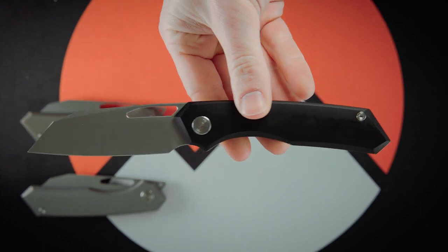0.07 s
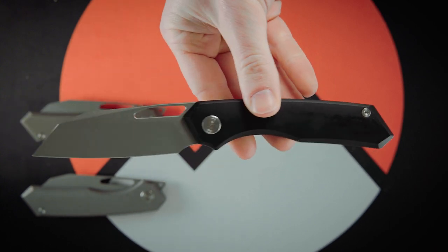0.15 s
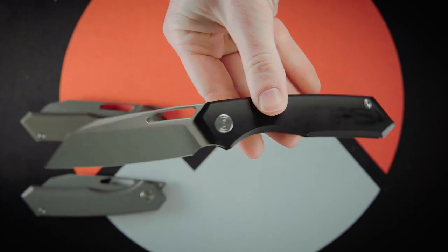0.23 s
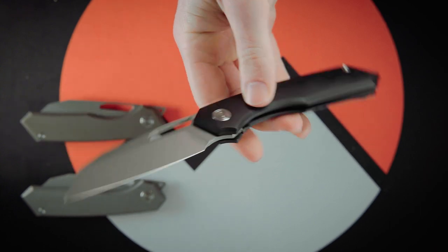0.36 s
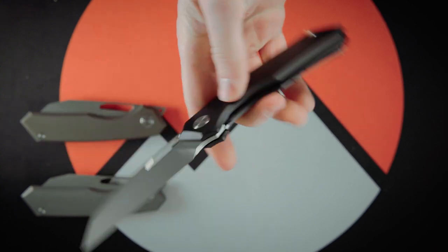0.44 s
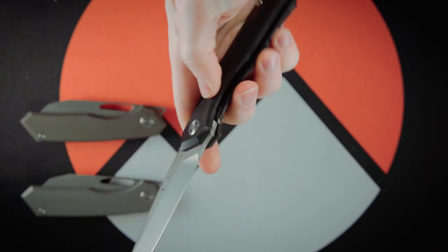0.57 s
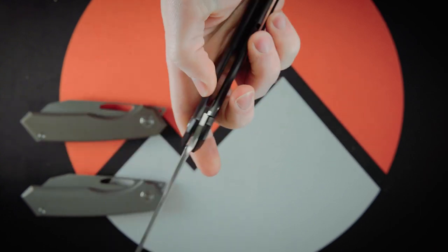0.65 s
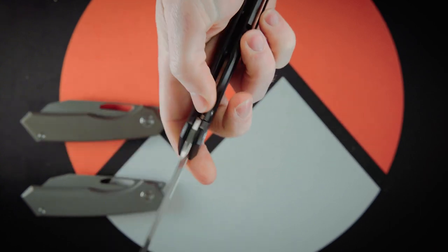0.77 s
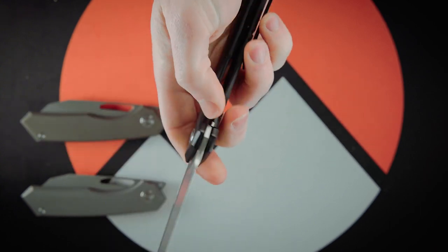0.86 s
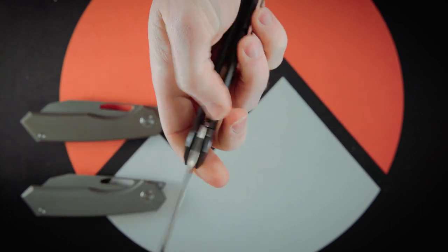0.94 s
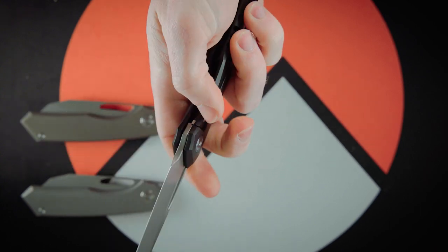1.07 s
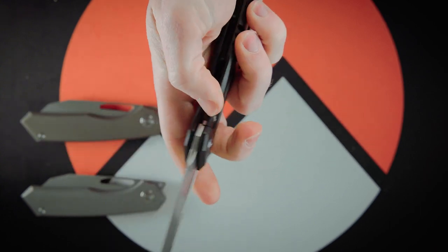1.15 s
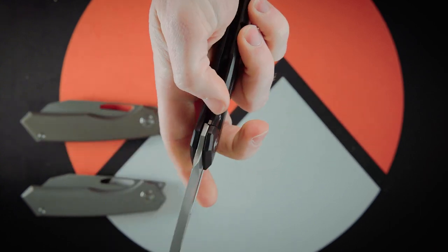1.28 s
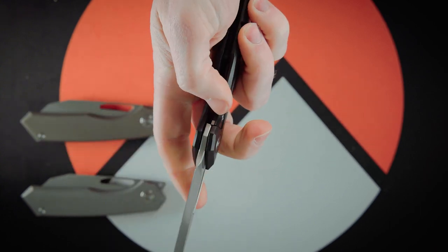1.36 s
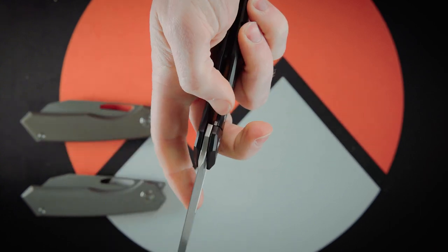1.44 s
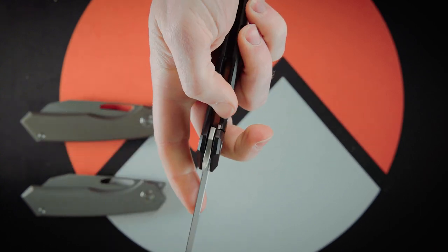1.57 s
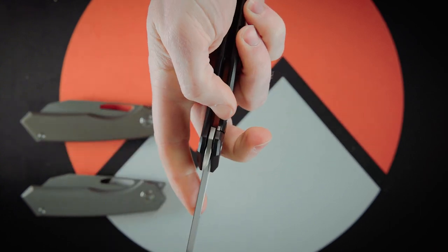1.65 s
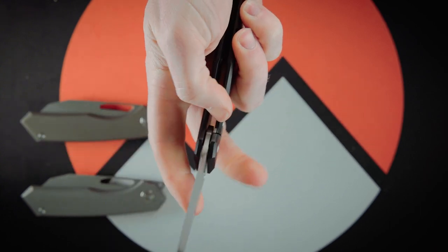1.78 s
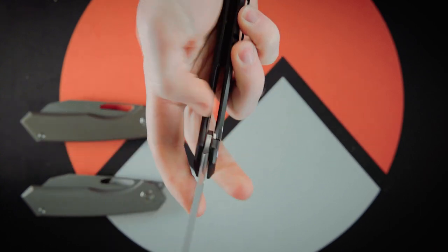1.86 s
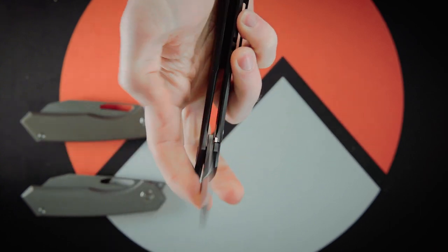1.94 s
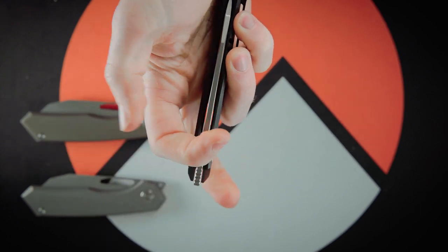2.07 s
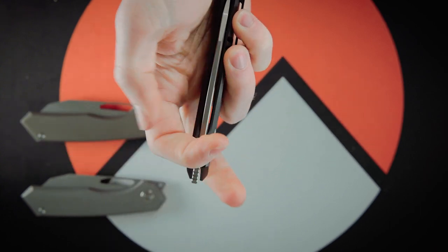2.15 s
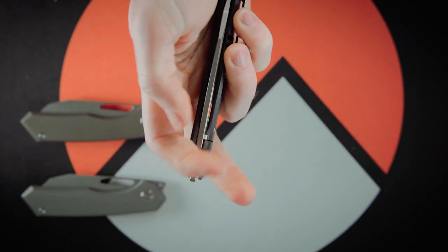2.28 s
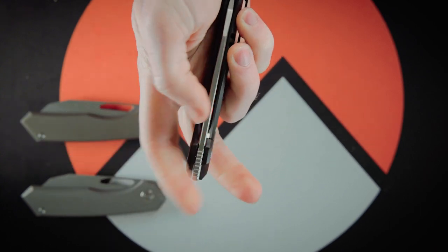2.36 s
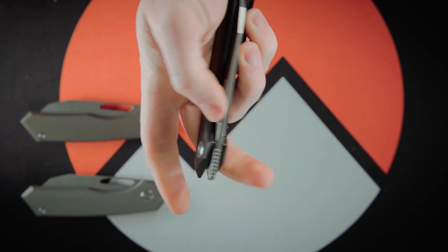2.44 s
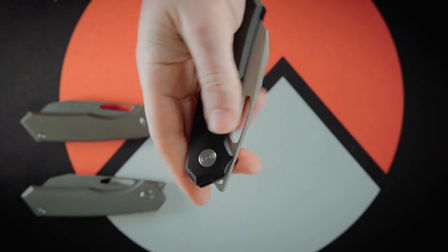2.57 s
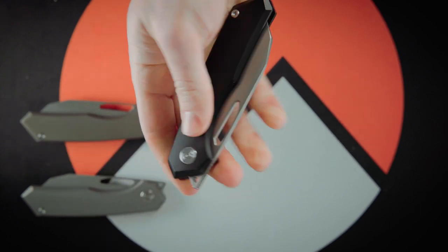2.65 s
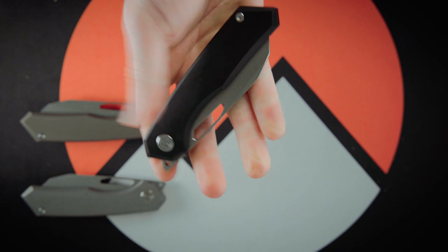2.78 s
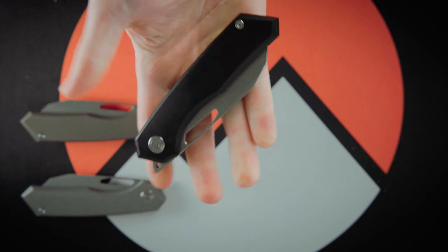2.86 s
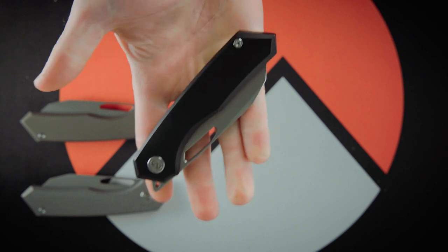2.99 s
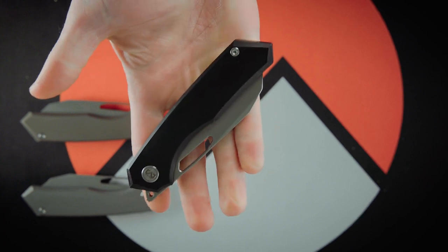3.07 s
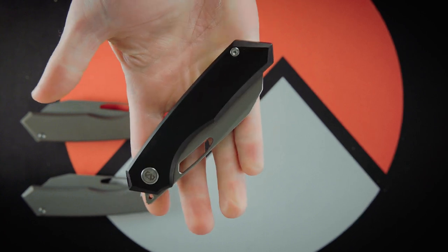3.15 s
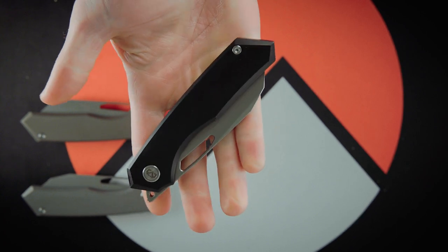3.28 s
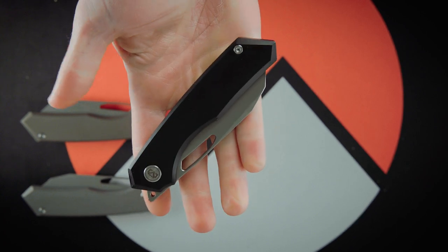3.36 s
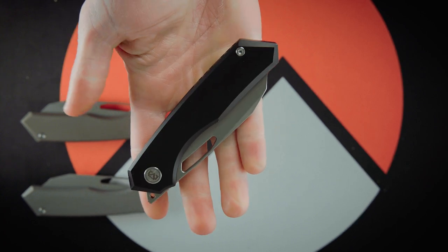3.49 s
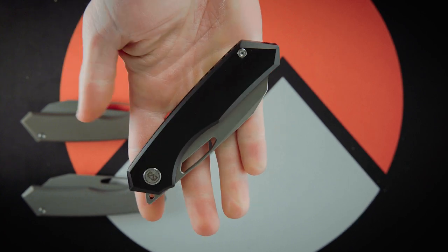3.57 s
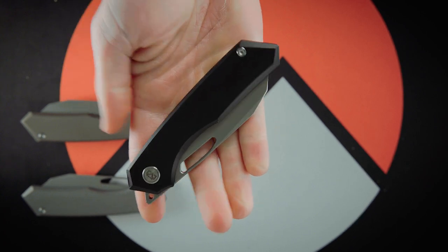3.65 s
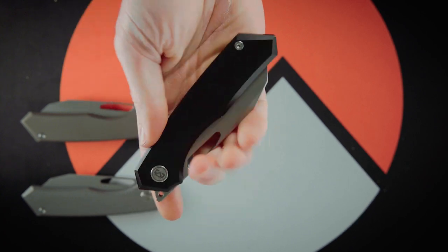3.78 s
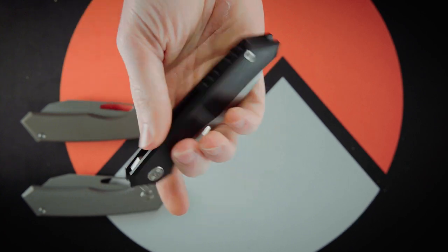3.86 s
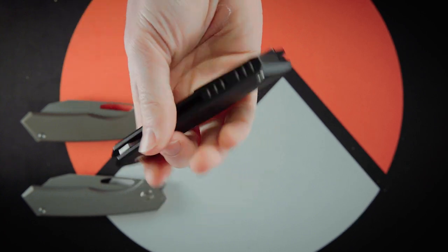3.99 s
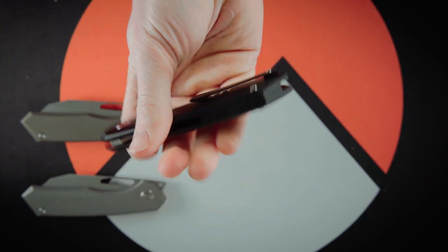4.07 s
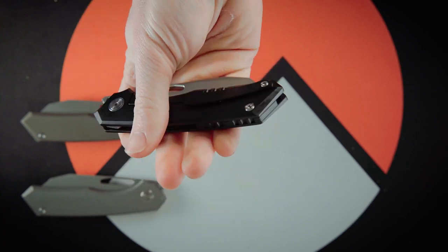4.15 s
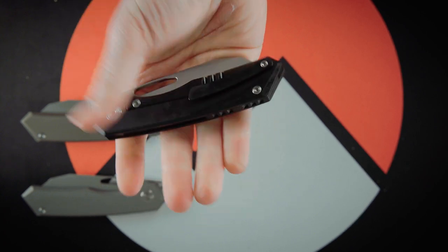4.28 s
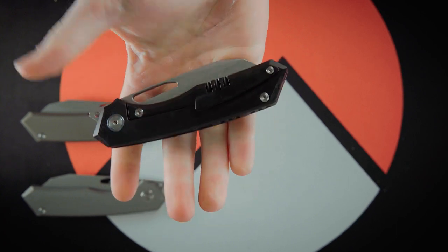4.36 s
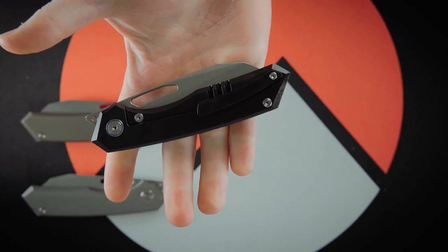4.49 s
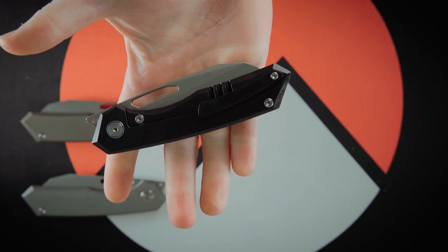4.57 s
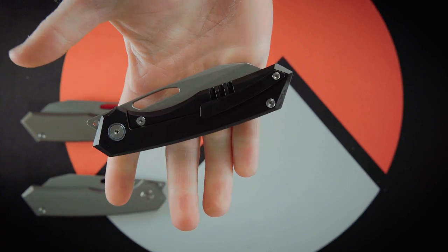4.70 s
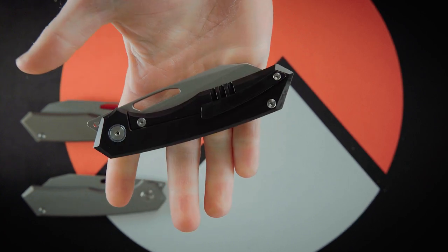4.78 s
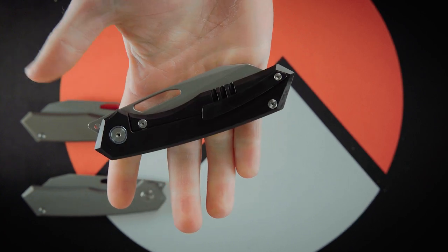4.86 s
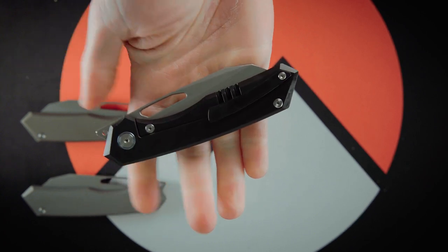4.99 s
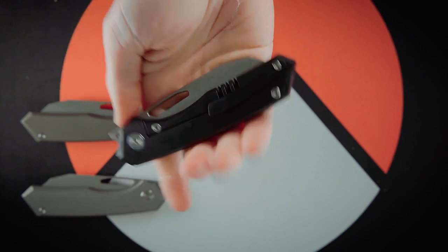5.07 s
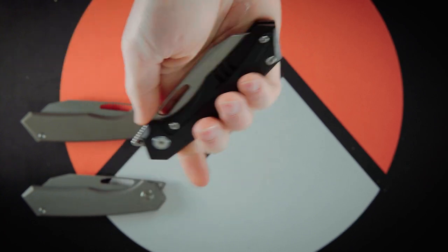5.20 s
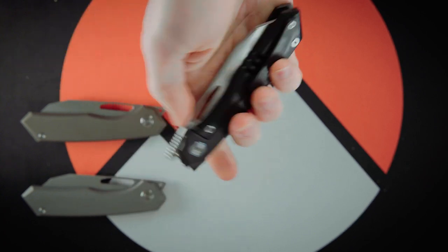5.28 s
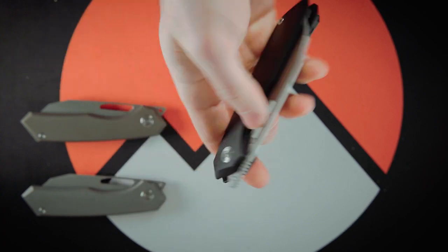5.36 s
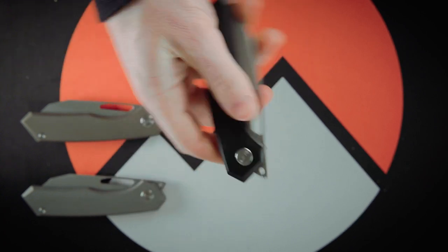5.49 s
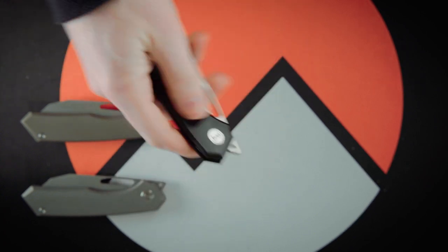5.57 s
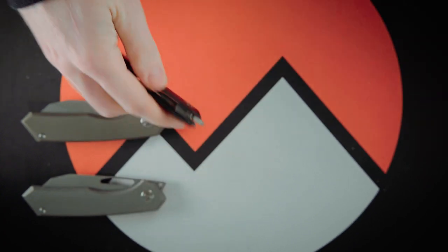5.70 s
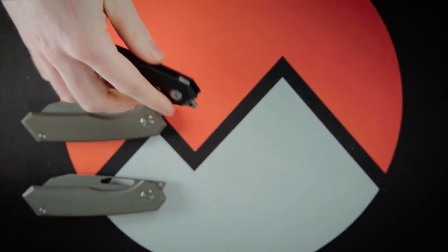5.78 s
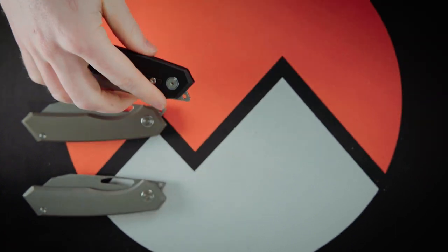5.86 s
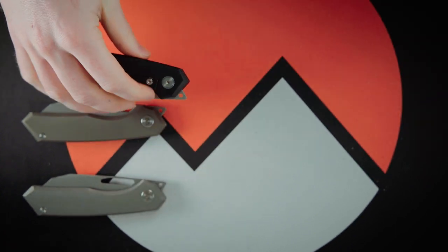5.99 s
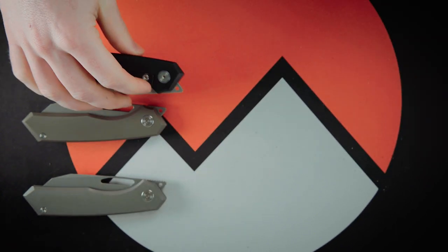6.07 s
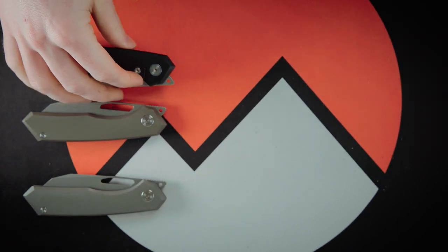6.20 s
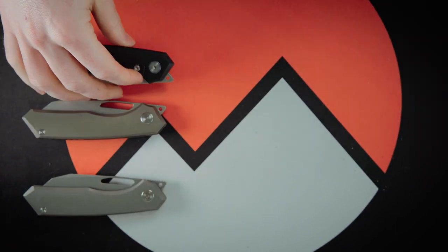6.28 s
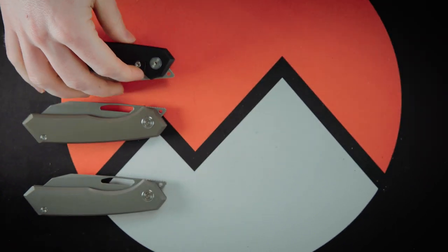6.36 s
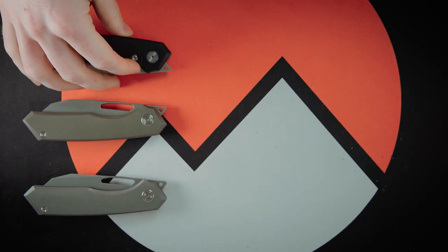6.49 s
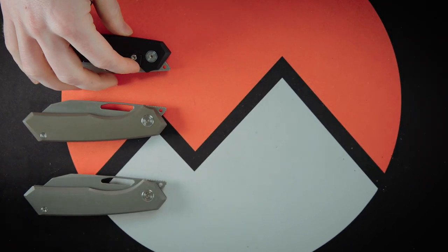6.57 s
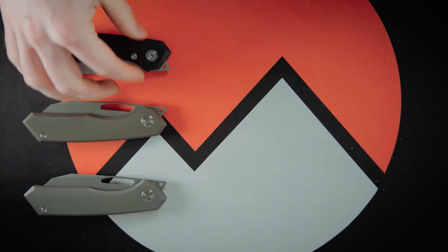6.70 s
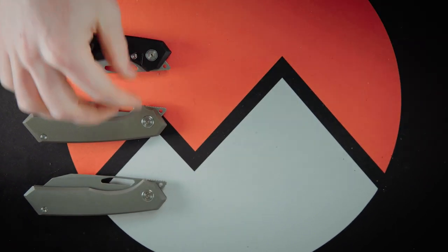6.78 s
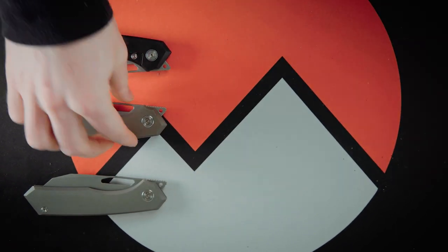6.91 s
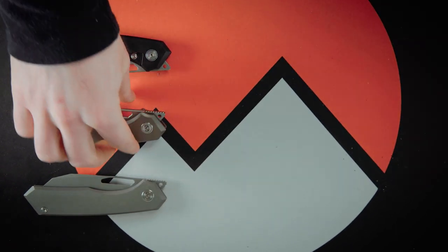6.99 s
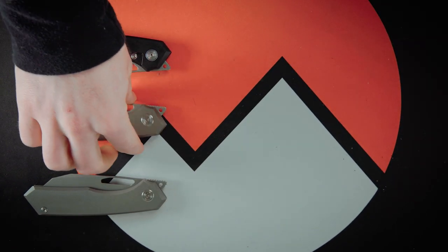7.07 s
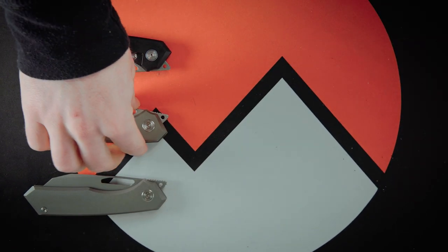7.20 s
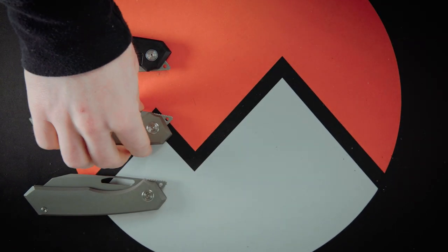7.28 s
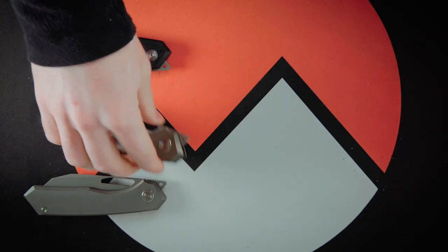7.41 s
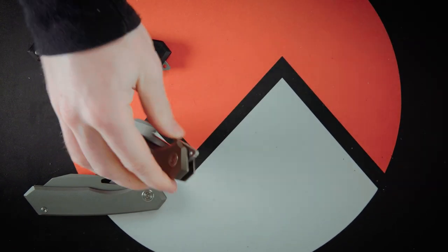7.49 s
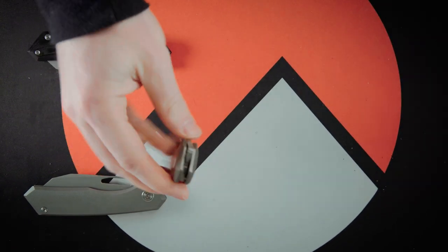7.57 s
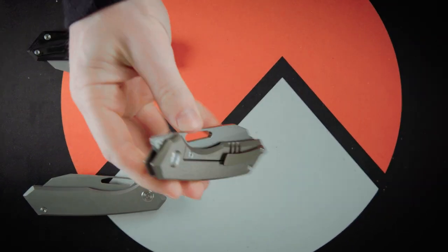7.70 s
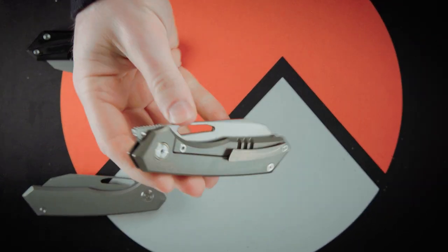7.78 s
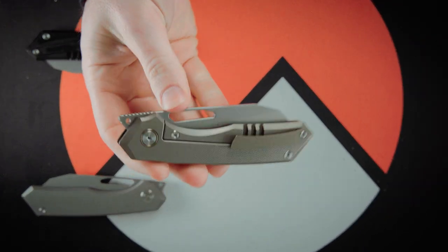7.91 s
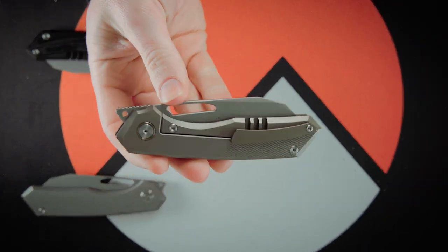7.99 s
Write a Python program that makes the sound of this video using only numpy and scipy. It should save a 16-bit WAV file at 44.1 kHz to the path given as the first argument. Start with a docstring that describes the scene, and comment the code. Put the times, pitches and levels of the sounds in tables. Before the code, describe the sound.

Quiet room air with low resonances and a deep hum that slowly swells and fades late on. Dry, close skin slips over a knife handle; the lock ticks, the blade snaps shut with a broad crack and bright chatter that echoes briefly. More faint rubbing and light scuffs, then a clustered wooden table knock with low thud and lingering resonance. Finally a low hand rumble and thin rubbing as another knife is lifted.

```python
"""Folding knife in a quiet room

A folding knife is handled close by in a fairly live room. The lock bar clicks free, the blade whirrs round
and snaps shut, fingers slide over the handle, the knife is put down on a table and another picked up.
Blows ring sets of decaying modes over short noise rasps; rubbing is a stream of tiny random slips through
resonances. Underneath lie room air, low resonances and a pure hum that swells and fades."""
import sys
import numpy as np
from scipy import signal
from scipy.fft import rfft, irfft
from scipy.io import wavfile

SR = 44100
rng = np.random.default_rng(int(sys.argv[2]) if len(sys.argv) > 2 else 0)


def wav_record(signal):
    """Record a signal, one row per channel, as 16-bit PCM in the file named by sys.argv[1]."""
    frames = np.transpose(np.atleast_2d(signal))
    bounded = np.clip(frames, -1, 1)
    # unit amplitude maps onto the largest positive 16-bit level
    quanta = np.round(bounded * 32767).astype(np.int16)
    wavfile.write(sys.argv[1], SR, quanta)


N = 354696
TIME = np.arange(N) / SR

# blade dropping into the handle and chattering there: [t/s, relative strength/dB]
SNAP = [(2.1124, -0.5), (2.1130, 1), (2.1146, -4), (2.1168, -11)]
# rasp of the closed knife's many damped modes: [f/Hz, relative level/dB]
KNIFE_RASP = [(300, -13), (1500, -8.5), (2100, -13), (2500, -4), (3000, -6.5), (3450, 3.5), (5500, 3),
              (6200, -3.5), (7600, -4.5), (8400, 1), (10000, -2.5), (12300, -4.5), (13300, -16),
              (16000, -21)]
# handle landing on the table: [t/s, relative strength/dB, softness/ms]
KNOCKS = [(6.582, -18.5, 1.4), (6.6094, 0, 0.019), (6.6221, -7.5, 0.41), (6.6379, -21, 0.13)]

# a hand movement builds for this share of its length; its level is this far down at both ends
STROKE_RISE_SHARE, STROKE_EDGE_DB = 0.62, 10


def from_db(db):
    """Decibels to gain."""
    return 10 ** (np.asarray(db) / 20)


def rms_one(x):
    """Scale to unit power."""
    return x / np.sqrt(np.mean(x ** 2) + 1e-20)


def at_hz(points, hz):
    """Read the levels of a spectrum table along log frequency."""
    points = np.array(points)
    return np.interp(np.log(np.maximum(hz, 1)), np.log(points[:, 0]), points[:, 1])


def coloured(x, spectrum):
    """Causal (minimum-phase) filter with the given spectrum, made by folding its cepstrum."""
    size = 16384
    log_gain = np.log(from_db(at_hz(spectrum, np.fft.rfftfreq(size, 1 / SR))))
    cepstrum = irfft(log_gain)
    cepstrum[1:size // 2] *= 2
    cepstrum[size // 2 + 1:] = 0
    impulse_response = irfft(np.exp(rfft(cepstrum)))
    return signal.fftconvolve(x, impulse_response)[:N]


def resonate(x, bands):
    """Parallel two-pole resonances of [f/Hz, width/Hz, level/dB], neighbours opposed in sign."""
    out = 0
    for k, (hz, width, db) in enumerate(bands):
        r = np.exp(-np.pi * width / SR)
        poles = [1, -2 * r * np.cos(2 * np.pi * hz / SR), r * r]
        gain = (-1) ** k * from_db(db) * (1 - r * r) / 2
        out = out + gain * signal.lfilter([1, 0, -1], poles, x)
    return out


def add(track, s, sound):
    """Mix a sound into a track at a time in seconds."""
    start = round(s * SR)
    track[start:start + len(sound)] += sound[:N - start]


def wander(per_s, depth_db):
    """A gain that drifts at random between evenly spaced knots."""
    knots = rng.standard_normal(int(per_s * N / SR) + 2)
    return from_db(depth_db * np.interp(TIME * per_s, np.arange(len(knots)), knots))


def ring(modes, spread_db, sign=-1):
    """Decaying sines of one blow, neighbours opposed if sign is -1; each blow shares its force differently."""
    hz, db, t60 = np.transpose(modes)[:, :, None]
    t = TIME[:int(t60.max() * SR)]
    signs = sign ** np.arange(len(modes))[:, None]
    gains = signs * from_db(db + spread_db * rng.standard_normal(db.shape))
    return np.sum(gains * 1000 ** (-t / t60) * np.sin(2 * np.pi * hz * t), axis=0)


def burst(t60):
    """A short dying rasp of unit energy."""
    t = TIME[:int(t60 * SR) + 2]
    rasp = rng.standard_normal(len(t)) * 1000 ** (-t / t60)
    return rasp / np.linalg.norm(rasp)


def strike(contacts, modes, rasp, rasp_db, rasp_t60):
    """Steel contacts: the strong modes ring over a brief rasp of many heavily damped ones."""
    rings, rasps = np.zeros((2, N))
    for s, db in contacts:
        add(rings, s, from_db(db) * ring(modes, spread_db=1.5))
        add(rasps, s, from_db(db + rasp_db) * burst(rasp_t60))
    return rings + coloured(rasps, rasp)


def friction(per_s, size_db):
    """Tiny slips at random moments, of uneven size and either sign."""
    sizes = from_db(size_db * np.minimum(rng.exponential(1, N), 4))
    return (rng.random(N) < per_s / SR) * sizes * rng.choice([-1, 1], N)


def stroke(s, length):
    """Gain of one movement of the hand: it builds up to its peak at s and lets go faster."""
    side_share = np.where(TIME < s, STROKE_RISE_SHARE, 1 - STROKE_RISE_SHARE)
    away = (TIME - s) / (length * side_share)
    return from_db(-STROKE_EDGE_DB * np.minimum(away ** 2, 20))


def rubbed(slips, bands):
    """As the touching point moves, different resonances stand out."""
    return rms_one(sum(wander(per_s=9, depth_db=5.0) * resonate(slips, [band]) for band in bands))


def blade_snap():
    """The blade hits the stop pin with a broad crack, then chatters and rings the knife."""
    # closed knife: [f/Hz, level/dB, t60/s]
    knife_modes = [(2533, -41, 0.04), (3460, -36, 0.028), (3740, -38, 0.039), (4036, -33, .026),
                   (4390, -36, .025), (4660, -34.5, .022), (5150, -32.5, 0.016), (5592, -35, .012),
                   (6495, -41, 0.024), (6970, -38, 0.018), (8530, -38, 0.037), (8540, -38, .018),
                   (9070, -36.5, .018), (9490, -39.5, .014), (9830, -37.5, 0.012), (10500, -40, 0.017),
                   (10810, -38.5, 0.016), (11000, -42, 0.0097), (11600, -42.5, 0.014)]
    # the blade's first blow on the stop pin: [f/Hz, relative level/dB]
    crack = [(40, -24.5), (130, 1.5), (500, 5), (1000, 3), (1600, 3), (2100, -13), (3200, -12), (7000, -10),
             (9500, -1.5), (12000, -8), (14000, -24)]
    blow = np.zeros(N)
    add(blow, SNAP[0][0], np.ones(1))
    add(blow, SNAP[1][0], from_db(-12) * burst(t60=0.029))
    chatter = strike(SNAP, knife_modes, KNIFE_RASP, rasp_db=-1.5, rasp_t60=0.018)
    return from_db(0.5) * coloured(blow, crack) + chatter


def pivot():
    """Bearings whirr as the blade gathers speed, then coasts; they stop when it hits the stop pin."""
    # ring of the pivot: [f/Hz, width/Hz, relative level/dB]
    pivot_bands = [(2420, 120, -8), (3750, 300, -10.5), (4700, 450, -1), (6430, 300, 0.5),
                   (7300, 1500, -10), (8790, 500, -11), (9800, 600, -12.5), (11650, 250, -8)]
    start_s, attack_s, level_db, drag_db_per_s = 2.014, 0.036, -62, 85
    age = TIME - start_s
    coasting = from_db(-drag_db_per_s * np.maximum(age - attack_s, 0))
    speed = np.clip(age / attack_s, 0, 1) * coasting
    whirr = rms_one(resonate(friction(per_s=3100, size_db=2.0), pivot_bands))
    return from_db(level_db) * speed * (TIME < SNAP[0][0]) * whirr


def lock_clicks():
    """The lock bar slips off the blade and rings with short metallic clicks."""
    # lock bar slipping off the blade: [t/s, relative strength/dB]
    clicks = [(1.417, -27), (1.8061, -7), (1.8076, 1), (1.8084, -6.5)]
    # lock bar: [f/Hz, level/dB, t60/s]
    lock_modes = [(2966, -48, .01), (3570, -47, .009), (3910, -40, .016), (4417, -46, .01),
                  (4720, -46.5, .01), (5050, -41, 0.01309), (5440, -41.5, 0.019), (5733, -42, .012),
                  (6200, -48, 0.0081), (6950, -53.5, 0.0085), (7700, -52, 0.0064), (9480, -59, .009)]
    # rasp of the lock bar's many damped modes: [f/Hz, relative level/dB]
    lock_rasp = [(300, -20), (1400, -11), (2200, -14), (3000, -1.5), (3900, 3.5), (5600, 4.5), (6400, -4),
                 (8000, -9), (11000, -15), (13000, -28.5), (16000, -38.5)]
    return strike(clicks, lock_modes, lock_rasp, rasp_db=-18, rasp_t60=0.024)


def table_knocks():
    """The handle lands in a few touches; a softer touch pushes longer and sounds duller."""
    # table top: [f/Hz, level/dB, t60/s]
    table_modes = [(104, -48, 0.53), (128, -45, 0.27), (177.6, -44, 0.37), (238, -33.5, 0.16),
                   (236, -45, 2.53), (242.4, -54, 1.9), (262, -31, 0.13), (296.6, -32.5, 0.13),
                   (360.3, -32, 0.37), (342, -51.5, 1.6), (436, -45, 0.59), (467, -32.5, .12),
                   (518, -31, 0.13), (564, -51.5, 1.3), (635, -33.5, 0.13), (656, -38, 0.12),
                   (746, -51, 0.15), (1390, -32.5, 0.012), (1870, -39.5, 0.01), (2730, -49, 0.01)]
    # boom of the table's frame and the things on it: [f/Hz, relative level/dB]
    table_boom = [(40, -25.5), (90, -3), (250, 3.5), (400, 0.5), (680, 0), (830, -21.5), (1100, -26),
                  (1600, -22), (2500, -40), (4000, -57), (6000, -53)]
    modes, boom = np.zeros((2, N))
    for s, db, soft_ms in KNOCKS:
        r = np.exp(-1000 / (soft_ms * SR))
        softened = signal.lfilter([1 - r], [1, -r], ring(table_modes, spread_db=2.5, sign=1))
        add(modes, s, from_db(db) * softened)
        add(boom, s, from_db(db + 11.5) * burst(t60=0.56))
    # the knocks carry almost nothing in the deep bass
    radiation = signal.butter(4, 80, "high", fs=SR, output="sos")
    return signal.sosfilt(radiation, modes + coloured(boom, table_boom))


def table_thud():
    """The firmest knock pushes the whole table down, and it rocks on its legs for a moment."""
    # the table rocking on its legs: [f/Hz, level/dB, t60/s]
    table_legs = [(66, -36.5, 0.27)]
    out = np.zeros(N)
    s, db, _ = max(KNOCKS, key=lambda knock: knock[1])
    add(out, s, -from_db(db) * ring(table_legs, spread_db=0))
    deep_band = signal.butter(2, [55, 85], "band", fs=SR, output="sos")
    return signal.sosfilt(deep_band, out + 1e-18)


def fingers():
    """Skin slips over the handle in uneven little runs; the same slips sound in scales and liners."""
    # finger strokes: [t of firmest pressure/s, length/s, level/dB, liners over scales/dB]
    strokes = [(.6, .2, -79, -8), (.685, 0.11, -73, -13), (.82, .1, -85, -11), (.92, 0.11, -84, -5),
               (1.021, 0.035, -74, -10), (1.057, 0.042, -77.5, -2), (1.17, .16, -82, -8),
               (1.199, 0.026, -79.5, 9), (2.587, 0.062, -75, 5), (2.635, .05, -79, 5), (2.76, 0.27, -87, 2),
               (2.875, 0.13, -77.5, -1), (2.97, 0.065, -82.5, 1), (3.793, 0.11, -83, 1),
               (3.916, .08, -74, 2.5), (4.0, 0.09, -73, -2.5), (4.065, 0.033, -74.5, -3),
               (4.177, 0.12, -75, 0), (4.33, 0.17, -76.5, -1), (5.206, .12, -78.5, 3),
               (5.429, .07, -73.5, 1), (5.482, .05, -77.5, 6.5), (5.541, 0.094, -74.5, 8.5),
               (5.664, 0.096, -75.5, -0.5), (5.706, 0.048, -71.5, -2.5), (5.834, 0.19, -75.5, -11),
               (5.996, 0.21, -77.5, -8.5), (6.14, .1, -87, -3), (7.118, .13, -82, -8),
               (7.2, 0.066, -75, -7), (7.333, 0.19, -70.5, -17), (7.458, 0.083, -69, -16)]
    # handle scales: [f/Hz, width/Hz, relative level/dB]
    scale_bands = [(2718, 690, -6.5), (3640, 800, -2), (4140, 650, 0.5), (5236, 740, -1.5), (6110, 500, -4)]
    # thin steel liners: [f/Hz, width/Hz, relative level/dB]
    liner_bands = [(7060, 1400, -3), (8150, 270, 2), (8810, 190, 1.5), (9500, 350, -6.5),
                   (11800, 2000, -19)]
    slips = friction(per_s=2600, size_db=2.5) * wander(per_s=90, depth_db=2)
    scales, liners = np.zeros((2, N))
    for s, length, db, liner_db in strokes:
        pressure = from_db(db) * stroke(s, length)
        scales = np.maximum(scales, pressure)
        liners = np.maximum(liners, from_db(liner_db) * pressure)
    return scales * rubbed(slips, scale_bands) + liners * rubbed(slips, liner_bands)


def slide():
    """Skin drawn over fine machining marks: a narrow hiss whose pitch follows the speed."""
    # faint whispers along the handle: [t of firmest pressure/s, length/s, level/dB,
    # starting pitch f/Hz, full-speed pitch f/Hz, half width/Hz]
    slides = [(5.541, 0.049, -69, 8770, 8940, 300), (5.979, .2, -80.5, 3900, 4300, 300),
              (7.11, .13, -81, 5200, 5280, 220), (7.332, 0.24, -76, 4200, 4300, 320),
              (7.72, .42, -83.5, 2770, 3410, 80)]
    settle_share = 0.3  # time constant of coming up to speed, as a share of the length
    out = 0
    for s, length, db, start_hz, full_hz, width_hz in slides:
        progress = np.maximum((TIME - s) / length + STROKE_RISE_SHARE, 0)
        hz = full_hz + (start_hz - full_hz) * np.exp(-progress / settle_share)
        phase = 2 * np.pi * np.cumsum(hz) / SR
        lowpass = signal.butter(2, width_hz, fs=SR, output="sos")
        unevenness = signal.sosfilt(lowpass, rng.standard_normal((2, N)))
        # two slow noises on a quadrature carrier make a band of hiss around the pitch
        hiss = rms_one(unevenness[0] * np.cos(phase) + unevenness[1] * np.sin(phase))
        out = out + from_db(db) * stroke(s, length) * hiss
    return out


def scuffs():
    """Light touches and hard edges rasp the knife, also as it lands on the table; softer ones lose their top."""
    # scuffs on the handle and ticks of the knife on the table: [t/s, relative strength/dB, brightness f/Hz]
    ticks = [(1.017, -40.5, 6040), (1.198, -49, 11000), (1.612, -34, 1500), (4.055, -46, 7000),
             (5.415, -36, 4000), (5.533, -33.5, 12000), (6.263, -43, 5000), (6.585, -36.5, 5500),
             (6.609, -7.5, 2480), (6.6122, -17.5, 5600), (6.614, -14, 3820), (6.622, -16, 3770),
             (6.6385, -29, 1800), (7.008, -41, 5000), (7.457, -34, 5930), (7.485, -20.5, 1500)]
    out = np.zeros(N)
    for s, db, bright_hz in ticks:
        contact = signal.butter(2, bright_hz, fs=SR, output="sos")
        add(out, s, from_db(db) * signal.sosfilt(contact, burst(t60=0.019)))
    return coloured(out, KNIFE_RASP)


def hands():
    """Palms and sleeve rumble softly as they move: random slips with a dull spectrum."""
    # hands shifting their hold and lifting the next knife: [t of fastest motion/s, length/s, level/dB]
    hand_moves = [(4.4, 0.97, -75), (4.59, 0.28, -65.5), (6.35, 1.2, -74.5), (7.15, 0.61, -63.5),
                  (7.745, 0.82, -66.5)]
    # dull rumble of the hands: [f/Hz, relative level/dB]
    hand_colour = [(25, -15.5), (90, 2), (170, -0.5), (260, 1.5), (420, -2), (650, -5.5), (1000, -16),
                   (1900, -19.5), (3000, -31), (8000, -41)]
    motion = np.max([from_db(db) * stroke(s, length) for s, length, db in hand_moves], axis=0)
    return motion * rms_one(coloured(friction(per_s=1500, size_db=1.5), hand_colour))


def room(x):
    """One dull early reflection, then a diffuse tail that dies band by band."""
    # reverberation: [f/Hz, t60/s, level/dB]
    reverb_bands = [(100.08, 0.66, -11), (250.1, 0.59, -12.5), (550, 1, -8.5), (900, .68, -11.5),
                    (1500, 0.83, -13), (2700, .68, -4.5), (4200, 0.76, -4.5), (5956, .54, -7.5),
                    (8400, 0.5, -7.5), (11000, .38, -12.5), (15000, .28, -11)]
    echo_s, echo_db, echo_hz = 0.0146, -13.5, 1800
    t = TIME[:SR]
    hz = np.fft.rfftfreq(SR, 1 / SR)
    white, tail = rfft(rng.standard_normal(SR)), 0
    # triangular bands that cross-fade between neighbouring rows
    place = np.interp(hz, [row[0] for row in reverb_bands], np.arange(len(reverb_bands)))
    for k, (_, t60, db) in enumerate(reverb_bands):
        band = irfft(white * np.maximum(1 - abs(place - k), 0), SR)
        onset = np.clip((t - 0.003) / 0.0048, 0, 1)
        decay = 1000 ** (-t / t60) * onset
        tail = tail + from_db(db) * band * decay / np.linalg.norm(decay)
    out = signal.fftconvolve(x, tail)[:N]
    dull = signal.butter(2, echo_hz, fs=SR, output="sos")
    add(out, echo_s, from_db(echo_db) * signal.sosfilt(dull, x + 1e-18))
    return out


def room_air():
    """Steady noise of the room air and of its low resonances."""
    # room air: [f/Hz, relative level/dB]
    air_spectrum = [(20, -17.5), (45, -8), (70, 0), (115, -8.5), (300, -5), (400, -10.5), (640, -11),
                    (760, -15.5), (950, -15.5), (1250, -20.5), (2100, -29.5), (5300, -30), (12000, -33.5),
                    (16000, -36)]
    # steady low resonances of the room: [f/Hz, width/Hz, relative level/dB]
    drone_bands = [(68.8, 8.6, 0), (200.5, 5.7, -9), (260.3, 10, -10), (325, 13, -12)]
    air = from_db(-69.5) * rms_one(coloured(rng.standard_normal(N), air_spectrum))
    drone = from_db(-70.5) * rms_one(resonate(rng.standard_normal(N), drone_bands))
    return air + drone


def low_hum():
    """A pure low sine in one long swell that wavers a little."""
    hum_hz, level_db, waver_db = 66.95, -43.5, 0.93
    start_s, rise_s, fall_s = 3.433, 3.16, 2.55
    ease = 1.46  # power that bends the straight rise and fall
    swell = np.interp(TIME, np.cumsum([start_s, rise_s, fall_s]), [0, 1, 0]) ** ease
    gain = from_db(level_db) * swell * wander(per_s=7, depth_db=waver_db)
    return gain * np.sqrt(2) * np.sin(2 * np.pi * hum_hz * TIME)


def scene():
    """Knife, hands and table in the room; the small touches sound close and dry."""
    lock = lock_clicks()
    loud = blade_snap() + table_knocks() + table_thud() + pivot()
    small = scuffs() + fingers() + slide() + hands()
    reverberation = room(loud + from_db(-2.5) * lock + from_db(-10.5) * small)
    background = room_air() + low_hum()
    return (loud + lock + small + reverberation + background)[None]


def record(dry):
    """The top is cut steeply above 15.8 kHz."""
    return signal.sosfilt(signal.ellip(12, 0.1, 80, 15800, fs=SR, output="sos"), dry)


dry = scene()
out = record(dry)
wav_record(out)
```